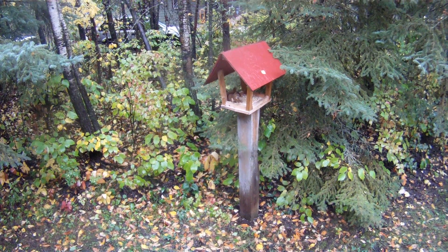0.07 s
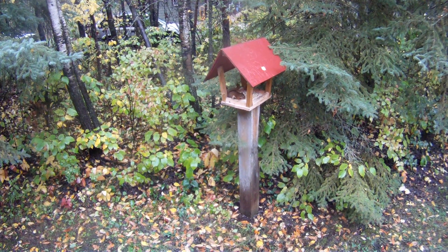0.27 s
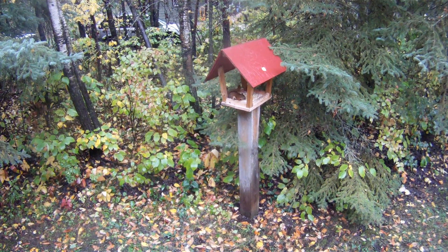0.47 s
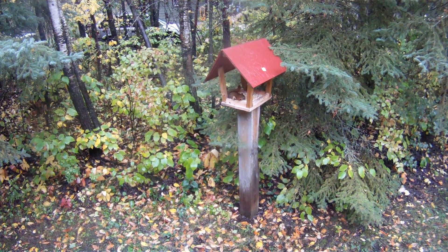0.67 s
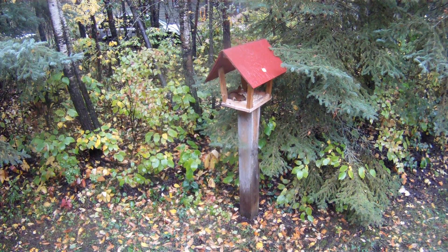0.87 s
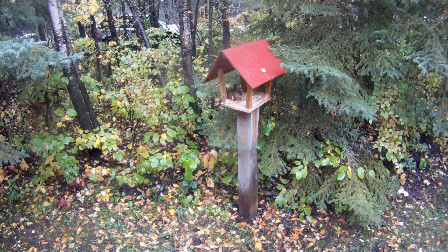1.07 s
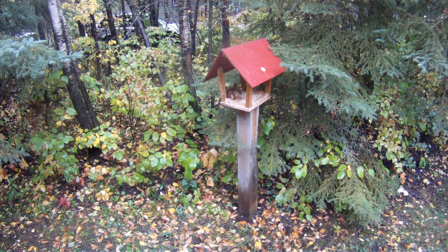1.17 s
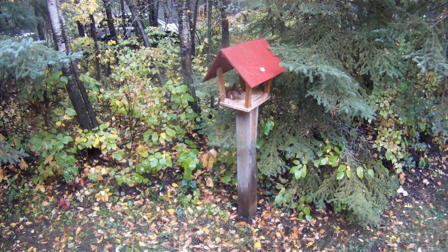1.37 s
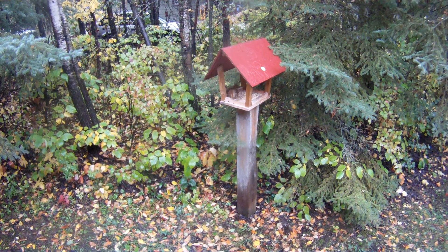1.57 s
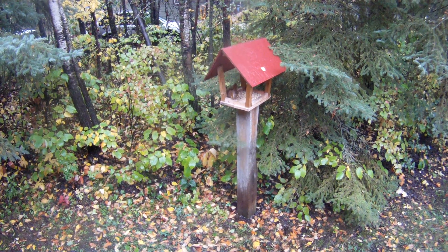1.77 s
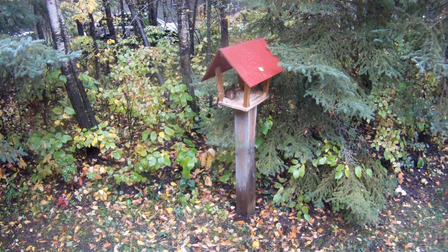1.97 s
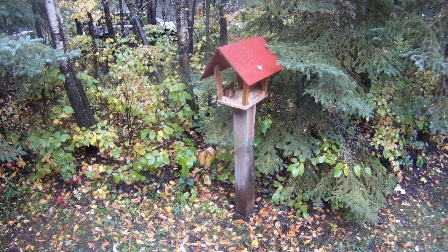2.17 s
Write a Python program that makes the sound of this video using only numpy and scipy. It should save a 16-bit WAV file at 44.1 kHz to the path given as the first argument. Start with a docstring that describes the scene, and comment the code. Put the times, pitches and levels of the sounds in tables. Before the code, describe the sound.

Light rain drips on leaves and wood, with one short slurred bird whistle.

```python
"""Light rain in a wet yard

A few near drops splash on leaves and wood, each impact exciting damped resonances, over fine patter,
a soft hiss of far rain and a faint hum. A bird gives one thin peep and later a slurred whistle, both
reflected by trees. A small camera samples slowly and holds each sample, which mirrors the spectrum
into the treble."""
import sys
import numpy as np
from scipy import signal
from scipy.fft import rfft, irfft
from scipy.io import wavfile
from scipy.ndimage import uniform_filter1d

SR = 44100
rng = np.random.default_rng(int(sys.argv[2]) if len(sys.argv) > 2 else 0)


def unload_wav(signal):
    """Save mono or channel-first audio to the path in sys.argv[1] as 16-bit WAV at rate SR, clipped to [-1, 1]."""
    wavfile.write(
        sys.argv[1],
        SR,
        np.round(np.clip(np.atleast_2d(signal).T, -1, 1) * 32767).astype(np.int16),
    )


N = 97020


def near_drops():
    """Impact excitation: a strike and its dying spray ring bright, and the struck surface resonates."""
    # near impacts: start_s, strike_peak_db, spray_t60_s, tap_hz, tap_width_hz, tap_peak_db
    impacts = [(.003, -38, 0.009, 4700, 900, -38.5), (.0106, -58, .012, 2040, 600, -34),
               (.0115, -41, .01, 960, 352, -37.5), (.0432, -37, .03, 2100, 895, -35.5),
               (.046, -47, .01, 1320, 500, -41), (.068, -37, .009, 4700, 900, -37),
               (.0755, -38.5, 0.041, 3300, 400, -39.5), (.083, -36, 0.029, 4670, 900, -38),
               (.112, -45, .008, 1290, 500, -48.5), (.172, -42, .01, 580, 302, -44.5),
               (.2234, -46, .023, 2880, 500, -44), (.2305, -56, .011, 3170, 500, -50),
               (.238, -23.5, 0.081, 3430, 610, -24), (.2385, -47, .02, 2220, 700, -42),
               (.2455, -47, .02, 730, 170, -38.5), (.2487, -33.5, .036, 3300, 600, -36),
               (.2515, -40, 0.078, 3380, 450, -35), (.4002, -24, 0.095, 3100, 690, -24),
               (.4003, -37, .03, 2190, 1200, -31.5), (.4057, -26.5, 0.066, 2900, 600, -28),
               (.4115, -40, .03, 3250, 500, -33), (.4235, -45, .03, 3220, 400, -38),
               (.5899, -25, 0.015, 4400, 700, -22), (.591, -36, 0.029, 4600, 380, -22),
               (.5916, -37, 0.024, 3050, 377, -13), (.5945, -20.5, 0.02, 3300, 450, -20.5),
               (.5985, -32.5, 0.07, 4600, 500, -25), (.6, -30, .04, 3070, 350, -22.5),
               (.6105, -37.5, 0.11, 3080, 280, -34), (.615, -44, .04, 3260, 350, -40.5),
               (.7509, -37, .032, 2650, 700, -36.5), (.7512, -56, .01, 1530, 600, -45),
               (.8515, -44, .01, 3300, 900, -42), (.8694, -42, 0.011, 1070, 450, -42),
               (1.0008, -36, .041, 1780, 900, -35), (1.0012, -56, .015, 900, 700, -40.5),
               (1.0015, -40, 0.017, 5620, 500, -33.5), (1.0018, -47, .015, 2580, 900, -35),
               (1.0246, -45, 0.025, 3000, 700, -51), (1.1228, -47, .011, 3530, 900, -44),
               (1.2326, -50, .014, 2800, 700, -39), (1.292, -48, .041, 1830, 900, -37.5),
               (1.3728, -41, .04, 3140, 800, -40), (1.5804, -49, .019, 1152, 220, -27),
               (1.5805, -35.5, 0.021, 3040, 560, -26.5), (1.5804, -55, .017, 2250, 1800, -28.5),
               (1.851, -54, .02, 4500, 900, -38), (1.861, -52, .01, 920, 350, -47),
               (1.921, -59, 0.022, 2070, 605, -42), (1.945, -57, .01, 680, 200, -44.5)]
    spray_db, tremble_db, tremble_t60_s = -20.5, -26, 0.03  # levels relative to the first impulse
    t = np.arange(8192) / SR
    impulse = 1. * (t == 0)
    droplets = level(clicks(per_s=4200, spread_db=-1), spray_db)
    tremble = rng.standard_normal((len(impacts), len(t))) * amp(tremble_db - 60 * t / tremble_t60_s)
    strike = splash(impulse)
    out = np.zeros(N + len(t))
    for k, (start_s, strike_db, spray_t60_s, tap_hz, tap_width_hz, tap_db) in enumerate(impacts):
        spray = droplets[k * 1700:][:len(t)] * amp(-60 * t / spray_t60_s)
        burst = (strike + splash(spray)) / np.abs(strike).max()
        tap = ring(impulse + tremble[k], tap_hz, tap_width_hz)
        i = int(start_s * SR)
        out[i:i + len(t)] += amp(strike_db) * burst + amp(tap_db) * tap / np.abs(tap).max()
    return out[:N]


def splash(force):
    """Superposition: three broad resonances of a splash add with alternating sign."""
    # splash resonances: centre_hz, width_hz, gain_db
    modes = [(3150, 606, 1), (4700, 730, -7), (2100, 770, -13.5)]
    return sum((-1) ** k * amp(db) * ring(force, hz, width) for k, (hz, width, db) in enumerate(modes))


def bird():
    """Frequency modulation: each call is a gliding, wavering, near-pure tone with a faint octave."""
    # slurred whistle: time_s, pitch_hz, rms_db
    whistle = [(1.34, 1150, -72), (1.37, 1237, -52), (1.398, 1371, -37.5), (1.436, 1537, -34),
               (1.46, 1571, -30.5), (1.488, 1553, -34.5), (1.503, 1489, -37), (1.53, 1346, -35),
               (1.553, 1245, -36), (1.566, 1183, -42), (1.6, 1159, -45.5), (1.645, 1185, -40.5),
               (1.675, 1170, -44), (1.698, 1199, -60.5), (1.74, 1160, -79)]
    # thin peep: time_s, pitch_hz, rms_db
    peep = [(.011, 3150, -57), (.015, 3165, -44.5), (.048, 3170, -53.5), (.062, 3230, -50),
            (.066, 3220, -72)]
    waver_depth, octave_db = 0.0016, -36
    t = np.arange(N) / SR
    song = 0
    for call in (whistle, peep):
        time_s, pitch_hz, rms_db = np.array(call).T
        glide_hz = uniform_filter1d(np.interp(t, time_s, pitch_hz), 400)
        phase = 2 * np.pi * np.cumsum(glide_hz * (1 + waver_depth * wander(rate_hz=59.8))) / SR
        envelope = uniform_filter1d(amp(np.interp(t, time_s, rms_db, -120, -120)), 400)
        song += np.sqrt(2) * envelope * (np.sin(phase) + amp(octave_db) * np.sin(2 * phase))
    return song


def tree_echo(song, gain_db=-21, t60_s=0.24, delay_s=0.032):
    """Diffuse reflection: trees throw the song back as a delayed, exponentially decaying tail."""
    t = np.arange(N) / SR
    tail = rng.standard_normal(N) * amp(-60 * t / t60_s) * (t > delay_s)
    return signal.fftconvolve(song, level(tail, gain_db) / np.sqrt(N))[:N]


def patter(puff_decay_s=0.004):
    """Shot noise: small drops ring the leaves with short puffs of noise; duller drips hit the soil."""
    hits = np.abs(clicks(per_s=760, spread_db=4))
    puffs = signal.lfilter([1], [1, -np.exp(-1 / (puff_decay_s * SR))], hits)
    leaves = ring(puffs * rng.standard_normal(N), hz=3050, width_hz=980)
    soil = ring(clicks(per_s=40, spread_db=4), hz=649, width_hz=360)
    return level(leaves, db=-60) + level(soil, db=-68.5)


def far_rain(swell_db=0.47, flicker_db=1.5):
    """Incoherent sum: far rain and air merge into noise whose bands swell together and flicker alone."""
    # spectrum of the hiss: frequency_hz, relative_density_db
    density = [(12, -62), (24, -4), (45, -1.5), (132, -3), (311, -6), (593, -2.5), (637, -4), (700, -0.5),
               (848, -10.5), (1100, -8.5), (1210, -10), (1430, -10.5), (2150, -7.5), (2480, -10),
               (3080, -8.5), (4000, -13.5), (4730, -9.5), (6000, -18.5), (7800, -60), (13200, -120)]
    hz, db = np.array(density).T
    bin_hz = np.fft.rfftfreq(N, 1 / SR) + 1
    spectrum = rfft(rng.standard_normal(N)) * amp(np.interp(np.log(bin_hz), np.log(hz), db))
    swell = swell_db * wander(rate_hz=1.0)
    hiss = 0
    for centre_log2_hz in np.arange(4, 13, .5):  # half-octave bands from 16 Hz up
        band = np.cos(np.pi / 2 * np.clip((np.log2(bin_hz) - centre_log2_hz) * 2, -1, 1)) ** 2
        hiss += irfft(spectrum * band, N) * amp(swell + flicker_db * wander(rate_hz=11.7))
    return level(hiss, db=-53)


def hum(pitch_hz=117.2, rms_db=-71, waver_db=0.5):
    """Amplitude modulation: a faint low tone wavers in level."""
    t = np.arange(N) / SR
    envelope = amp(rms_db - waver_db * wander(rate_hz=9.93))
    return np.sqrt(2) * envelope * np.sin(2 * np.pi * pitch_hz * t)


def ring(x, hz, width_hz):
    """Resonance: two stages in cascade, each width_hz wide, give steep skirts."""
    b, a = signal.iirpeak(hz, hz / width_hz, fs=SR)
    return signal.lfilter(b, a, signal.lfilter(b, a, x))


def clicks(per_s, spread_db):
    """Poisson process: impulses of either sign, with levels in dB spread exponentially."""
    chance, polarity, size = rng.random((3, N))
    return (chance < per_s / SR) * np.sign(polarity - .5) * amp(-spread_db * np.log(1 - size))


def wander(rate_hz):
    """Low-pass noise: random steps, smoothed twice and scaled to unit variance."""
    hold = int(SR / rate_hz)
    steps = np.repeat(rng.standard_normal(N // hold + 1), hold)
    drift = uniform_filter1d(uniform_filter1d(steps, hold), hold)[:N]
    return drift / drift.std()


def amp(db):
    """Decibels as an amplitude ratio."""
    return 10 ** (np.asarray(db) / 20)


def level(x, db):
    """Scaling to an rms level in decibels."""
    return x * amp(db) / np.sqrt(np.mean(x ** 2))


def scene():
    """Superposition: the pressures of all sources add in one channel."""
    song = bird()
    return (song + tree_echo(song) + hum() + near_drops() + patter() + far_rain())[None]


def record(dry, cutoff_hz=15400):
    """Zero-order hold: holding each sample leaves spectral images in the treble; the top is cut."""
    slow = signal.resample_poly(dry, 40, 147, axis=1)  # 12000 samples a second
    stairs = np.repeat(slow, 4, axis=1)
    held = signal.resample_poly(stairs, 147, 160, axis=1)[:, 2:]  # back to SR, less the hold's delay
    held = np.pad(held, ((0, 0), (0, 8)))[:, :N]
    return signal.sosfilt(signal.cheby1(10, .5, cutoff_hz, fs=SR, output="sos"), held)


dry = scene()
out = record(dry)
unload_wav(out)
```